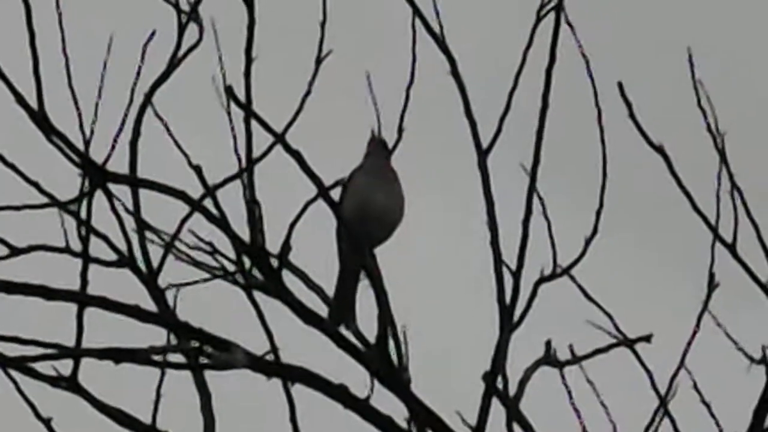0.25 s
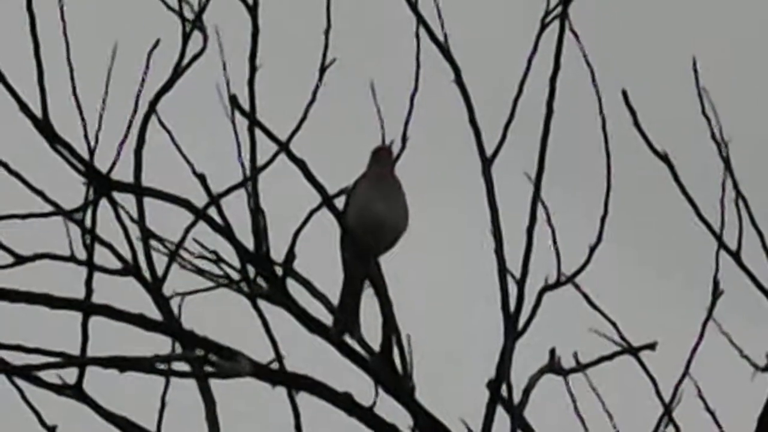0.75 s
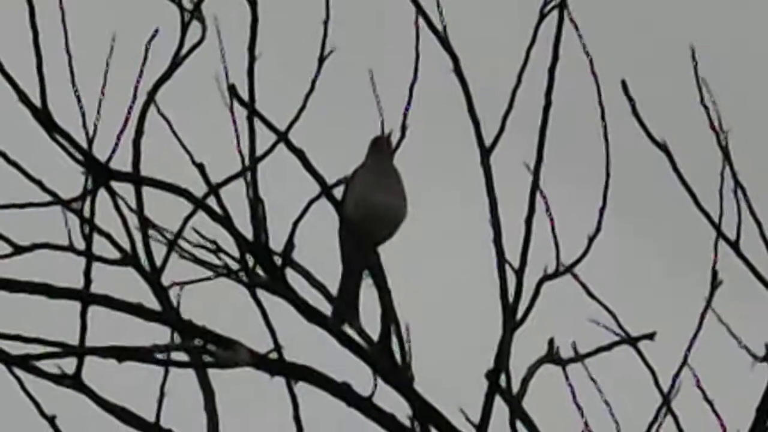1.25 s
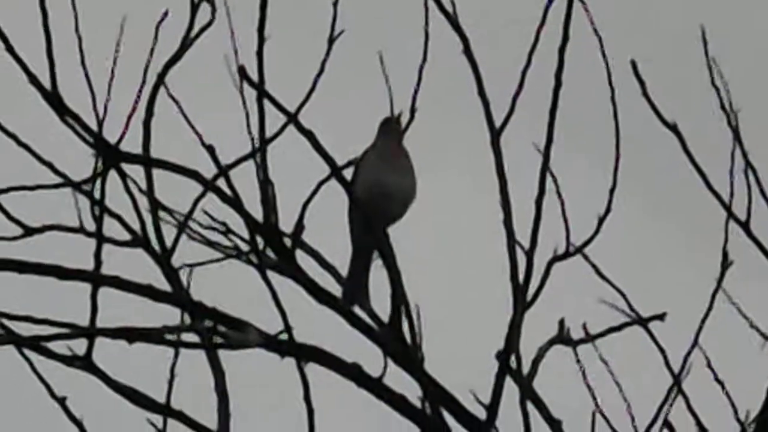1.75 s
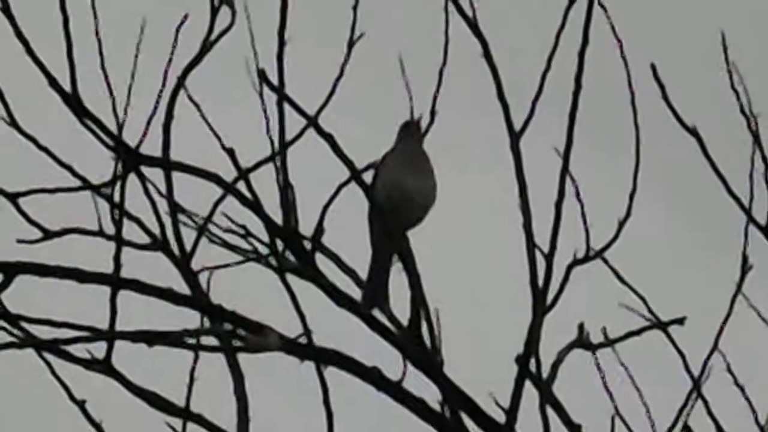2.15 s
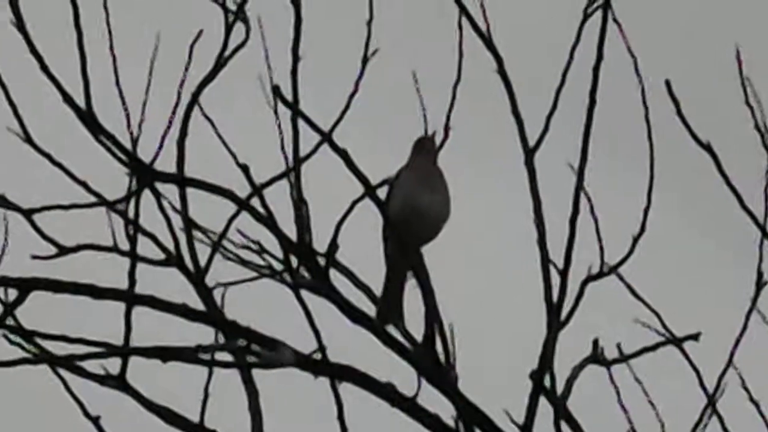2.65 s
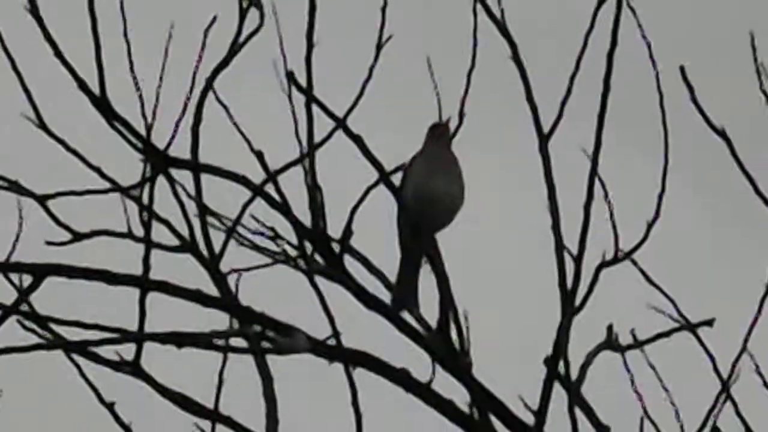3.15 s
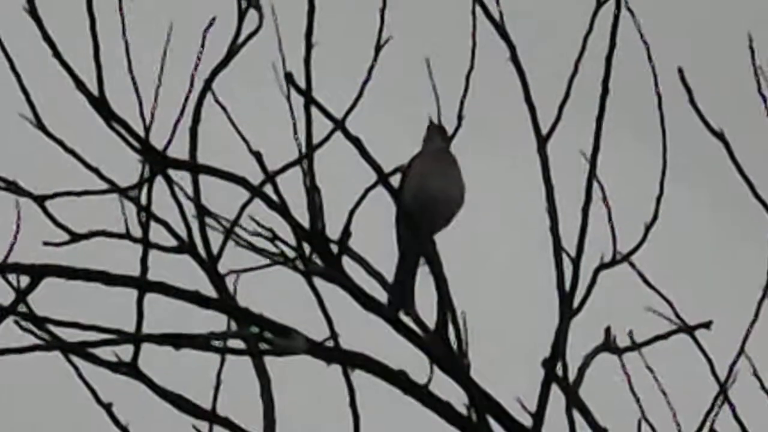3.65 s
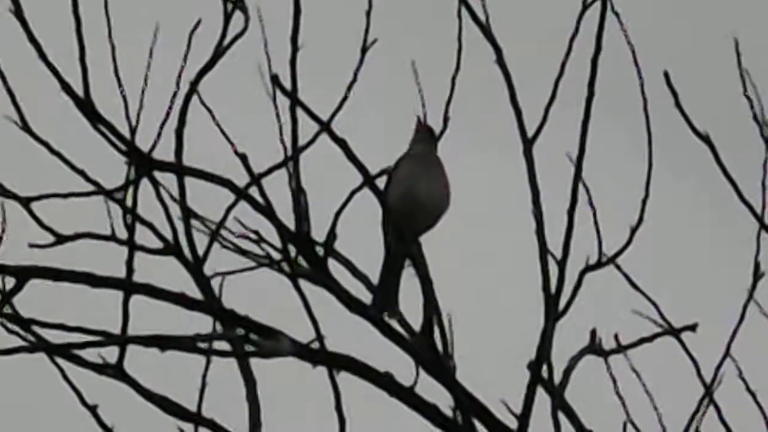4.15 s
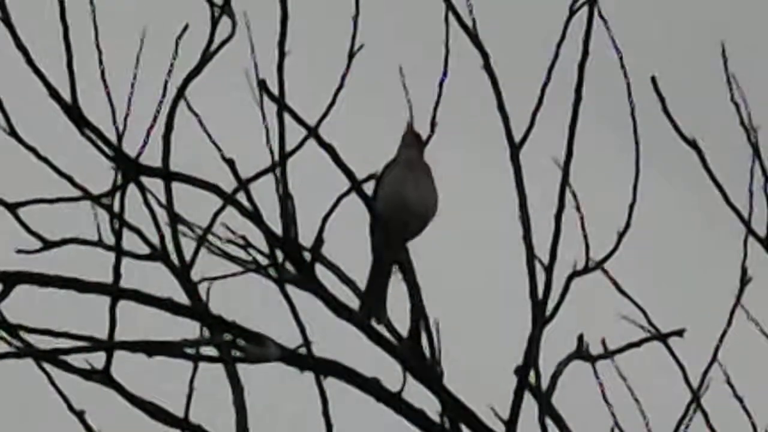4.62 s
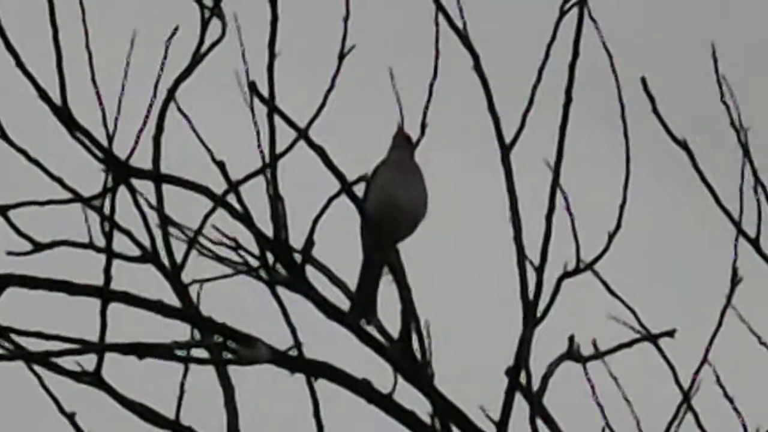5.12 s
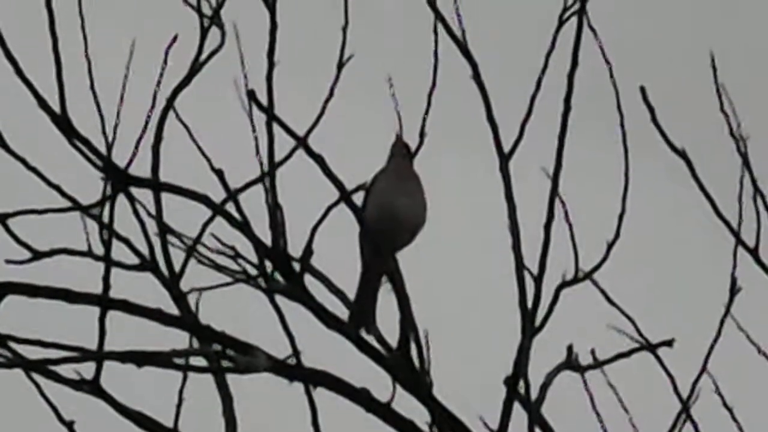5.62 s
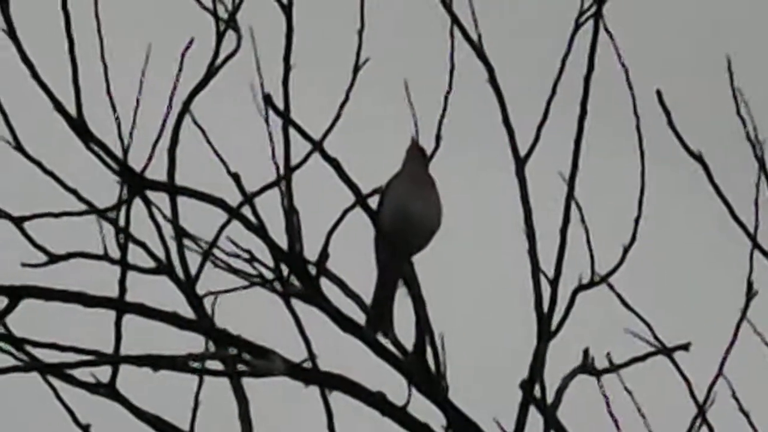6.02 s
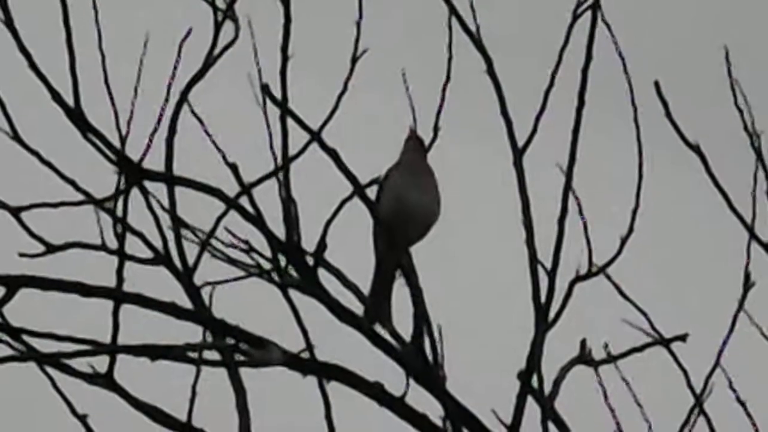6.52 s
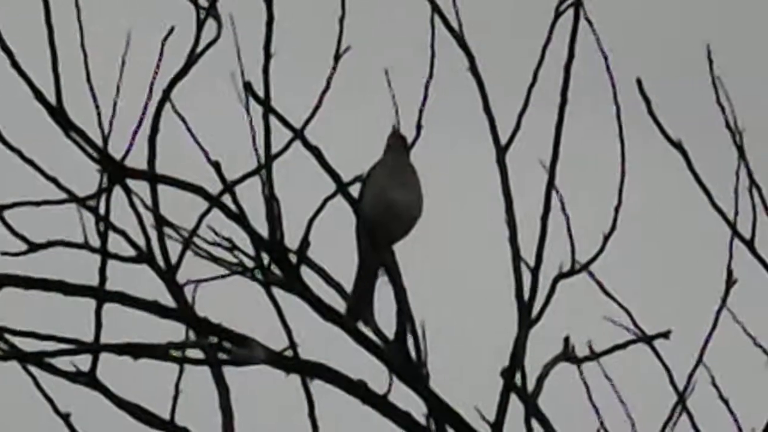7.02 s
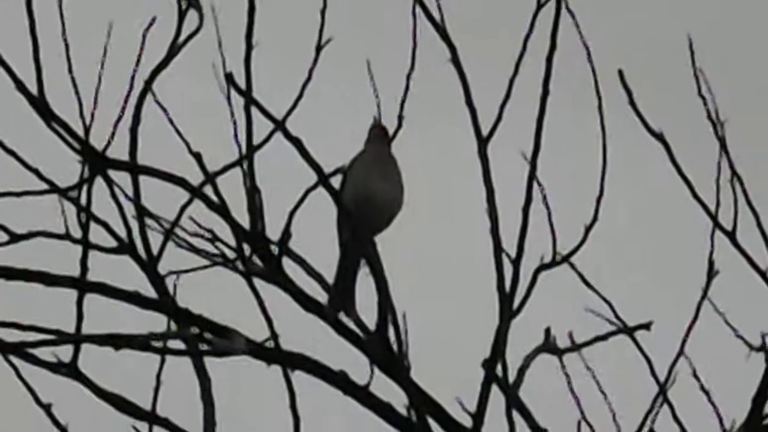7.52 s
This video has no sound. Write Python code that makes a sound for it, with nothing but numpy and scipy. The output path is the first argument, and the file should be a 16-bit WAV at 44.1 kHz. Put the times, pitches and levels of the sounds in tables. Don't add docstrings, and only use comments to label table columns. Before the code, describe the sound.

A damp wood with soft rain hiss, faint traffic hum and low wind rumble. At about 0.2 s a near thrush whistles one strong slur, rising quickly then sinking until 0.5 s. Until about 3 s it rests: distant birds whistle through blurred echoes, drips tick and harder drops knock on wood near 2 to 3 s. At 3.2 s a faint high buzzing rattle and trills come from afar, then a soft low waver at 3.6 s. The thrush returns around 4 s with falling slides, a quick upward sweep at 4.65 s and a clear held note at 4.9 s. A quick drop comes at 5.4 s, a fluttering five-part warble at 6 to 6.2 s, and short falling slurs at 6.5 to 6.7 s. Distant calls continue; wood taps at 7.2 and 7.5 s precede the sharpest knock at 7.6 s. Level dips after loud notes, recovering in steps.

```python
import sys
import numpy as np
from scipy import signal
from scipy.fft import rfft, irfft, next_fast_len
from scipy.io import wavfile
from scipy.ndimage import uniform_filter1d, minimum_filter1d, map_coordinates

SR = 44100
rng = np.random.default_rng(int(sys.argv[2]) if len(sys.argv) > 2 else 0)


def rack_gain(trim_db):
    fader = np.asarray(trim_db, float)
    return 10 ** (fader / 20)


def wav_out(sig):
    wavfile.write(sys.argv[1], SR, np.round(np.clip(np.atleast_2d(sig).T, -1, 1) * 32767).astype(np.int16))


N = 342657
T = np.arange(N) / SR


def unit(x):
    return x / np.sqrt(np.mean(x ** 2) + 1e-20)


def wobble(rate):
    knots = rng.standard_normal(int(N * rate / SR) + 4)
    return map_coordinates(knots, [T * rate])


def coloured(x, spectrum):
    hz, db = np.transpose(spectrum)
    m = next_fast_len(N + 8192)
    log_hz = np.log(np.fft.rfftfreq(m, 1 / SR) + 1)
    gain = rack_gain(np.interp(log_hz, np.log(hz), db, left=-120, right=-120))
    return unit(irfft(rfft(x, m) * gain, m)[:N])


def add(track, s, sound):
    part = track[round(s * SR):][:len(sound)]
    part += sound[:len(part)]


def wood(near_db, near_t60, far_db, far_t60):
    t = np.arange(SR * 3 // 5) / SR
    near = rng.standard_normal(len(t)) * rack_gain(-60 * t / near_t60)
    far = rng.standard_normal(len(t)) * rack_gain(-60 * t / far_t60)
    far *= 1 - np.exp(-t / 0.016)
    answer = rack_gain(near_db) * near / np.linalg.norm(near) + rack_gain(far_db) * far / np.linalg.norm(far)
    answer[0] += 1
    return answer


def whistle(rows, edge_s, overtone_db, warble_hz, flutter_db):
    s, hz, db = np.transpose(rows)
    t = s[0] + np.arange(round((s[-1] - s[0]) * SR)) / SR
    chance = rng.standard_normal(SR)
    shake = unit(uniform_filter1d(chance[:len(t)], size=200))
    flutter = uniform_filter1d(uniform_filter1d(chance[::-1], size=400), size=300)
    flutter = unit(flutter)[:len(t)]
    pitch_hz = uniform_filter1d(np.interp(t, s, hz), size=130) + warble_hz * shake
    phase = 2 * np.pi * np.cumsum(pitch_hz) / SR
    to_end_s = np.minimum(t - s[0], s[-1] - t)
    edge = np.sin(np.pi / 2 * np.clip(to_end_s / edge_s, 0, 1)) ** 2
    level = np.sqrt(2) * rack_gain(np.interp(t, s, db) + flutter_db * np.minimum(flutter, 1)) * edge
    return level * (np.sin(phase) + rack_gain(overtone_db) * np.sin(3 * phase))


# time_s, level_db
GUSTS = [(0.0, -37), (0.32, -41), (0.54, -30), (0.84, -41), (1.84, -27.5), (3.09, -38.5), (3.74, -34.5),
         (4.0, -25.5), (4.09, -35.5), (4.39, -26), (4.7, -25), (5.0, -40), (5.06, -26), (6.34, -39.5),
         (7.66, -36.5), (7.77, -41)]
# frequency_hz, density_db
BUFFET = [(18, -36.5), (30, -4), (38, -3.5), (48, -11), (60, -27)]
# frequency_hz, density_db
RUMBLE = [(26, -34), (45, -6), (59, 0.5), (86, -3.5), (162, -13), (220, -30), (290, -53), (480, -120)]
RUMBLE_DB, RUMBLE_GROWS = -37, 0.11


def wind():
    gust_db = np.interp(T, *np.transpose(GUSTS))
    rumble_db = RUMBLE_DB + RUMBLE_GROWS * (gust_db - gust_db.mean()) + 1.5 * wobble(2.97)
    buffet = rack_gain(gust_db + 1.3) * coloured(rng.standard_normal(N), BUFFET)
    return buffet + rack_gain(rumble_db) * coloured(rng.standard_normal(N), RUMBLE)


# frequency_hz, density_db
RAIN = [(88, -35.5), (150, -4.5), (308, -6.5), (510, -9.5), (670, -12.5), (1150, -11.5), (1350, -13),
        (1570, -9.5), (2560, -9), (3290, -2), (5250, -26), (9040, -34), (15900, -43)]
RAIN_DB, RAIN_EASES_DB = -35.5, 2.5


def rain(spiky_db, grains):
    ticks = (rng.random(N) < grains / SR) * rack_gain(spiky_db * np.minimum(rng.exponential(size=N), 3))
    smear = rack_gain(-60 * np.arange(600) / SR / .013) * rng.standard_normal(600)
    treble = signal.butter(4, 4500, "high", fs=SR, output="sos")
    ticks = signal.sosfilt(treble, signal.fftconvolve(ticks, smear)[:N])
    hiss = rng.standard_normal(N) * rack_gain(1.4 * wobble(12))
    level = rack_gain(RAIN_DB - RAIN_EASES_DB * T * SR / N)
    return level * coloured(hiss + rack_gain(-6.5) * unit(ticks), RAIN)


# start_s, end_s, first_hz, last_hz, level_db
HUMS = [
    (0, .297, 350, 350, -45.5),
    (0, .256, 453, 453, -45.5),
    (4.27, 4.68, 592, 632, -49),
    (4.58, 5.06, 630, 612, -52),
    (4.62, 4.88, 314, 314, -46.5),
    (4.5, 4.63, 340, 380, -50),
    (4.22, 4.34, 355, 335, -48),
    (5.124, 5.588, 280, 250, -45.5),
    (1.7, 1.812, 860, 930, -48.5),
]


def drones():
    drift, hum = 0.8 * wobble(12), np.zeros(N)
    for start_s, end_s, first_hz, last_hz, db in HUMS:
        u = np.clip((T - start_s) / (end_s - start_s), 0, 1)
        hz = first_hz + (last_hz - first_hz) * u
        swell = np.sin(np.pi * u) ** 0.64
        hum += rack_gain(db) * swell * np.sin(2 * np.pi * np.cumsum(hz) / SR + drift)
    return rack_gain(2.5 * wobble(24)) * hum


# frequency_hz, density_db
CHORUS = [(2200, -24), (2800, -5.5), (3300, 1.5), (3800, -8.5), (4800, -15.5), (5600, -30.5)]
# time_s, level_db
CHOIR = [(0, -27.5), (.34, -53), (.54, -31), (1.5, -32.5), (1.7, -41), (3.27, -34.5), (3.94, -31.5),
         (4.37, -37.5), (4.799, -31), (5.3, -31), (5.84, -33), (6.14, -35.5), (7.5, -37), (7.77, -55)]


def chorus(count):
    blur, t = np.zeros(N), np.arange(SR // 12) / SR
    for u, pitch, glide, size in rng.random((count, 4)):
        glide_hz = 10000 * (glide - .6 + 0.3 * np.sign(glide - .6))
        hz = 2900 + 950 * pitch ** 1.6 + glide_hz * (t - .04)
        slur = np.hanning(len(t)) * np.sin(2 * np.pi * np.cumsum(hz) / SR)
        add(blur, u * N / SR, rack_gain(7 * size) * slur)
    blur = signal.fftconvolve(blur, wood(near_db=3.0, near_t60=0.13, far_db=5, far_t60=0.58))[:N]
    band = rack_gain(2.0 + 2.1 * wobble(9)) * coloured(rng.standard_normal(N), CHORUS)
    return rack_gain(np.interp(T, *np.transpose(CHOIR))) * unit(unit(blur) + band)


# start_s, peak_db
SPLASHES = [(.0344, -40), (.1062, -36.5), (.7135, -35), (1.827, -39.5), (1.886, -38), (2.1535, -36.5),
            (2.1694, -43), (2.7482, -31.5), (2.822, -36), (2.8334, -32.5), (3.7414, -43.5), (4.4804, -33),
            (4.6674, -42), (4.7986, -34.5), (5.8014, -36), (6.054, -32), (6.263, -34), (6.4454, -34.5),
            (6.5175, -35), (6.8036, -35), (6.832, -30.5), (7.5844, -36)]
# start_s, peak_db
PATS = [(.5342, -31), (1.065, -35.5), (1.2212, -31), (1.372, -42), (2.3446, -42.5), (2.5172, -32.5),
        (3.2894, -42), (3.5224, -33), (3.9724, -31), (5.096, -32), (5.161, -47), (5.235, -40.5),
        (5.5303, -28.5), (6.6072, -32), (6.6567, -24), (6.9626, -39.5), (7.442, -36), (7.5098, -32)]
# start_s, peak_db
TICKS = [
    (.8345, -47.5),
    (.9564, -44),
    (1.732, -40),
    (5.8316, -38),
]
# start_s, peak_db, pitch_hz
TAPS = [(1.962, -18.5, 3070), (2.3299, -17.5, 3490), (2.86, -24, 3900), (2.931, -18, 3120),
        (5.704, -15.5, 3000), (7.205, -21.5, 1810), (7.511, -20, 3300), (7.512, -24, 4500),
        (7.628, -8.5, 3150), (7.627, -23, 2250), (7.629, -27, 5300), (7.644, -17, 3200), (7.656, -16, 3150),
        (7.206, -24, 2900), (2.33, -24, 4500), (1.803, -28, 2600)]
# start_s, peak_db, pitch_hz
PLOPS = [
    (.11, -33, 1090),
    (2.499, -35, 1105),
    (3.02, -41, 1113),
    (6.12, -39, 780),
    (1.098, -38, 1495),
    (5.2, -39, 1494),
]
# pitch_hz, splash_db, band edge over centre (ratio)
SPLASH, PAT, TICK = (4850, -13, 1.28), (4900, -26, 1.28), (7500, -17, 1.28)
TAP_SPLASH_DB, TAP_EDGE = -34.5, 1.13


def drips():
    wet, t = np.zeros(N), np.arange(SR // 20) / SR
    bright = signal.butter(2, 8000, "high", fs=SR, output="sos")
    drops = [(*tap, TAP_SPLASH_DB, TAP_EDGE) for tap in TAPS]
    for rows, kind in [(SPLASHES, SPLASH), (PATS, PAT), (TICKS, TICK)]:
        drops += [(s, db, *kind) for s, db in rows]
    for s, db, hz, splash_db, edge in drops:
        body = signal.butter(3, [hz / edge, hz * edge], "band", fs=SR, output="sos")
        puff = rng.standard_normal((2, len(t))) * rack_gain(-60 * t / 0.017) * (1 - np.exp(-t / 0.00053))
        tap = signal.sosfilt(body, puff[0])
        splash = signal.sosfilt(bright, puff[1])
        drop = rack_gain(db + 1.5) * (tap / abs(tap).max() + rack_gain(splash_db) * splash / abs(splash).max())
        answer = wood(near_db=-4.0, near_t60=0.27, far_db=-10.0, far_t60=0.36)
        add(wet, s, signal.fftconvolve(drop, answer))
    for s, db, hz in PLOPS:
        ring = np.sin(2 * np.pi * hz * (t + 1.8 * t * t))
        bubble = rack_gain(db - 60 * t / 0.059) * ring * (1 - np.exp(-t / 0.0014))
        answer = wood(near_db=5.0, near_t60=0.28, far_db=-8.0, far_t60=0.29)
        add(wet, s, signal.fftconvolve(bubble, answer))
    return wet


# start_s, length_s, top_hz, bottom_hz, level_db
TRILLS = [(4.44, 0.17, 2480, 1900, -25), (3.27, .34, 4950, 2900, -31.5), (3.88, .1, 2650, 2000, -36),
          (6.22, .2, 2700, 1950, -37), (7.635, 0.025, 3350, 2900, -31), (3.465, .035, 4300, 3000, -28),
          (.55, .17, 5400, 3400, -41.5), (2.56, 0.19, 5200, 3700, -41), (6.97, 0.147, 5300, 3700, -42),
          (4.73, .1, 5400, 3800, -40), (1.12, .3, 5200, 3900, -44.5), (3.64, .39, 2800, 2300, -36),
          (4.48, 0.16, 4100, 3300, -35), (6.675, .03, 4200, 3300, -37), (3.6, .085, 3450, 2850, -27.5),
          (3.7, .14, 3350, 2800, -32), (2.63, 0.21, 3600, 3050, -34), (2.96, 0.08, 6500, 2400, -46),
          (6.26, 0.12, 4600, 3100, -38.5), (6.42, 0.097, 5000, 3600, -39.5)]
# start_s, length_s, top_hz, bottom_hz, level_db
RASPS = [
    (7.203, 0.037, 2900, 1400, -31.5),
    (4.762, 0.027, 2100, 1300, -34),
    (3.24, .38, 6700, 4500, -45.5),
]
TRILL_RATE, RASP_RATE, BUZZ_RATE = 32, 130, 56
TRILL_ECHO_DB, BUZZ_ECHO_DB = 6, -1.5
BUZZ_S, BUZZ_PERIOD_S, BUZZ_LENGTH_S, BUZZ_HZ, BUZZ_DB = 3.243, .0965, 0.052, (6940, 6000), -34.5


def trills():
    calls, pace = np.zeros(N), 1 + 0.3 * wobble(30)
    bursts = [(*row, TRILL_RATE, TRILL_ECHO_DB) for row in TRILLS]
    bursts += [(*row, RASP_RATE, TRILL_ECHO_DB) for row in RASPS]
    for k in range(4):
        start_s = BUZZ_S + k * BUZZ_PERIOD_S
        bursts.append((start_s, BUZZ_LENGTH_S, *BUZZ_HZ, BUZZ_DB, BUZZ_RATE, BUZZ_ECHO_DB))
    for s, length, top_hz, bottom_hz, db, rate, echo_db in bursts:
        t = np.arange(round(length * SR)) / SR
        turn = np.cumsum(rate * pace[round(s * SR):][:len(t)]) / SR % 1
        hz = top_hz + (bottom_hz - top_hz) * turn ** 1.4
        level = rack_gain(db) * np.sin(np.pi * turn ** .9) * signal.windows.tukey(len(t), .15)
        note = level * np.sin(2 * np.pi * np.cumsum(hz) / SR)
        answer = wood(near_db=echo_db, near_t60=.16, far_db=echo_db - 1.5, far_t60=.6)
        add(calls, s, signal.fftconvolve(note, answer))
    return rack_gain(-2.5) * calls


# start_s, length_s, pitch_hz, level_db
HELD = [(0.689, .15, 6000, -53), (0.848, 0.025, 1925, -39), (1.022, 0.23, 3065, -27),
        (7.016, .03, 7280, -41), (4.004, .03, 7150, -44), (7.0, .09, 4360, -38), (5.72, .1, 3520, -34),
        (0.86, .09, 3880, -41), (5.45, .16, 2735, -33), (5.44, .06, 3070, -25), (6.565, .05, 3120, -24),
        (6.795, .025, 3100, -33), (3.94, .02, 2570, -27), (3.745, .04, 2060, -30), (6.81, .07, 7150, -58),
        (2.846, 0.09, 7300, -56.5), (2.926, 0.032, 3204, -30.5), (3.74, 0.03, 3170, -27),
        (4.285, .1, 4900, -31), (4.3, .07, 4790, -33), (6.297, 0.13, 3375, -31.5),
        (7.016, 0.112, 3324, -33.5), (6.32, 0.064, 3820, -39), (7.06, .06, 3850, -43)]
# start_s, length_s, first_hz,
# last_hz, level_db
SLIDES = [(0.482, 0.05, 3880, 3950, -35), (0.79, 0.045, 3200, 3400, -22), (.5, .24, 3480, 3570, -26),
          (.63, .06, 3270, 3400, -32), (.835, .16, 3480, 3570, -26), (5.5, .22, 3450, 3530, -27),
          (5.11, .27, 2960, 3090, -27), (5.7, .04, 3320, 3150, -25), (5.82, .18, 3450, 3560, -27),
          (5.935, .045, 3150, 3260, -24), (4.33, .03, 1820, 2200, -33), (2.622, .149, 3150, 3500, -31),
          (3.2, .03, 2200, 2500, -38), (3.352, .077, 3166, 3360, -28), (3.867, 0.023, 3200, 3000, -24),
          (4.228, 0.06, 3250, 2680, -25), (4.473, .14, 3955, 3326, -35), (4.787, 0.05, 3220, 3000, -28.5),
          (3.72, .03, 3200, 2650, -31), (3.75, 0.025, 3000, 2500, -31), (3.865, .03, 2950, 2400, -29),
          (3.848, .02, 3200, 2700, -31), (2.928, .045, 3500, 3000, -32), (1.32, .07, 3150, 3700, -30),
          (1.788, 0.044, 4730, 4350, -40.5), (5.263, 0.074, 4880, 3180, -23.5),
          (3.27, .05, 5140, 3670, -32.5), (3.416, 0.036, 4710, 3650, -33), (3.557, .053, 4940, 3605, -29),
          (1.295, 0.079, 4700, 4050, -38), (1.368, 0.048, 4000, 4300, -40)]
# start_s, held_hz, level_db
FALLS = [
    (1.126, 4530, -40.5),
    (2.55, 4190, -35),
    (3.94, 4330, -32),
    (4.73, 4190, -34),
    (6.228, 4390, -37),
    (6.958, 4380, -32),
]
FALL_S, FALL_SPAN_HZ, FALL_DB, LAND_S = .042, 1150, -5, .055
# start_s, first_hz, level_db
CHIPS = [
    (.183, 7450, -37.5),
    (4.006, 7270, -36.5),
    (7.018, 7450, -34),
]
CHIP_S, CHIP_END_HZ = .035, 6000
# start_s, pitch_hz, level_db
SEEPS = [(.142, 6770, -47), (.614, 8400, -56.5), (.954, 7900, -47), (1.43, 7800, -62), (1.533, 8500, -59),
         (1.717, 7830, -45.5), (2.94, 8260, -55), (3.54, 8000, -46), (4.601, 8270, -55.5),
         (4.87, 6580, -61), (5.515, 7700, -45.5), (5.662, 8050, -57), (6.416, 7750, -47), (7.05, 8600, -58),
         (7.302, 8120, -48)]
SEEP_S, SEEP_SAG_HZ = 0.043, 200


def far_notes():
    notes = [(s, length, hz, hz, db) for s, length, hz, db in HELD]
    notes += SLIDES
    notes += [(s, FALL_S, hz + FALL_SPAN_HZ, hz, db + FALL_DB) for s, hz, db in FALLS]
    notes += [(s + FALL_S, LAND_S, hz, .98 * hz, db) for s, hz, db in FALLS]
    notes += [(s, CHIP_S, hz, CHIP_END_HZ, db) for s, hz, db in CHIPS]
    notes += [(s, SEEP_S, hz, hz - SEEP_SAG_HZ, db) for s, hz, db in SEEPS]
    return notes


WANDER_HZ, WANDER_S = 14, .03


def others():
    calls = np.zeros(N)
    for s, length, first_hz, last_hz, db in far_notes():
        u = np.linspace(0, 1, num=int(length / WANDER_S) + 3)
        stray_hz = WANDER_HZ * rng.standard_normal(16)[:len(u)]
        hz = first_hz + (last_hz - first_hz) * u + stray_hz
        rows = np.c_[s + length * u, hz, db - 2.5 * u]
        span_hz = abs(first_hz - last_hz)
        shake_hz = .14 * max(span_hz - 100, 0) + 22 + 70 * (first_hz / 8000) ** 3
        note = whistle(rows, edge_s=.012, overtone_db=-70, warble_hz=shake_hz, flutter_db=3)
        echo_db = 8 * min(span_hz / 500, 1.6) + 1
        answer = wood(near_db=echo_db, near_t60=0.2, far_db=echo_db - 3.5, far_t60=0.76)
        heard = signal.fftconvolve(note, answer)
        add(calls, s, heard * np.linalg.norm(note) / np.linalg.norm(heard))
    return rack_gain(.6) * calls


# delay_ms, gain (ratio)
BOUNCES = [
    (2.93, 0.21),
    (5.9, .8),
    (16.9, -.15),
]


def bounced(x):
    m = next_fast_len(N + 8192)
    khz = np.fft.rfftfreq(m, 1000 / SR)
    comb = 1 + sum(gain * np.exp(-2j * np.pi * khz * ms) for ms, gain in BOUNCES)
    response = unit(abs(comb)) * np.exp(1j * np.angle(comb))
    return irfft(rfft(x, m) * response, m)[:N]


# pitch_hz, level_db
THROAT = [(1770, -25), (2050, -24.5), (2350, -16.5), (2550, -5), (2750, -2.5), (3100, 0), (3250, 0),
          (3600, -13)]
# (time_s, pitch_hz)
SLURS = [ (-5.5, -12, -7, [(.173, 1990), (.222, 2520), (.24, 2712), (.266, 2890), (.293, 3200),
         (.306, 3235), (.326, 3200), (.48, 2035), (.51, 1900)]), (-13.5, 8.5, 2, [(3.988, 3030),
         (4.003, 3200), (4.04, 2944), (4.075, 2700), (4.092, 2560)]), (-3.5, -7, -8.5, [(4.096, 2573),
         (4.13, 2548), (4.174, 2525)]), (-9, 4, 0, [(4.383, 2536), (4.41, 2490), (4.428, 2396),
         (4.45, 2120)]), (-5, 1, -11, [(4.651, 2790), (4.661, 3600)]), (-13, 7.5, 1.5, [(4.83, 3400),
         (4.845, 3240), (4.875, 2636), (4.89, 2400), (4.9, 2920)]), (0, -10, -13, [(4.899, 2852),
         (4.965, 2851), (5.005, 2872), (5.062, 2912)]), (-13.5, 3, 0.5, [(5.387, 3620), (5.403, 3330),
         (5.409, 3090), (5.418, 3057), (5.424, 2750), (5.437, 2710), (5.447, 2314), (5.47, 2000),
         (5.497, 1770)]), (-12, 0, -4, [(6.522, 2752), (6.535, 3100), (6.544, 3200), (6.551, 3160),
         (6.56, 2765), (6.578, 2320), (6.6, 1940)]), (-14, -1, 1, [(6.633, 2386), (6.655, 2150)]),
         (-6.5, -3, 0, [(6.662, 2180), (6.687, 2000), (6.708, 1860)]), ]
ATTACK_DB, ATTACK_S = -8, .012
# start_s, held_hz, held_db, flick_db
WARBLE = [
    (5.978, 2606, -18, -17),
    (6.018, 2562, -18.5, -16),
    (6.067, 2545, -11.5, -13.5),
    (6.114, 2490, -13, -15.5),
    (6.167, 2420, -20.5, -20.5),
]
HOLD_S, FLICK_S, DWELL_S, TUMBLE_S = 0.028, .003, .003, .009
FLICK_RATIO, TUMBLE_HZ, TUMBLE_DB = 1.225, 2250, -7
# time_s, pitch_hz, level_db
WAVER = [
    [(3.577, 1886, -33), (3.598, 2020, -31), (3.612, 1950, -35), (3.622, 1870, -27), (3.64, 2200, -38),
     (3.656, 2268, -34), (3.672, 2224, -25), (3.684, 2042, -35), (3.7, 2046, -31)],
    [(3.7, 2278, -32), (3.716, 2342, -25), (3.75, 2060, -26), (3.776, 2342, -24), (3.8, 2190, -28),
     (3.808, 2125, -35), (3.832, 2165, -31.5), (3.85, 2133, -44)],
]
# time_s, pitch_hz, level_db
ASIDES = [
    [(3.13, 2480, -38), (3.145, 2620, -34), (3.155, 2700, -34), (3.172, 2560, -34), (3.195, 2440, -36)],
    [(5.66, 4900, -36), (5.675, 4450, -31), (5.685, 4050, -30), (5.7, 3990, -32)],
]
WARBLE_ECHO_DB, FLICK_ECHO_DB, WAVER_ECHO_DB = -12, -2, 1.5


def thrush():
    notes = []
    for db, fade_db, echo_db, pitch in SLURS:
        s, hz = np.transpose(pitch)
        at = np.arange(s[0], s[-1], 1 / 500)
        hz = np.interp(at, s, hz)
        u = (at - s[0]) / (s[-1] - s[0])
        attack_db = ATTACK_DB * np.clip(1 - (at - s[0]) / ATTACK_S, 0, 1)
        level_db = db + fade_db * u ** 2 + attack_db + np.interp(hz, *np.transpose(THROAT))
        notes.append((echo_db, np.c_[at, hz, level_db]))
    for s, hz, db, flick_db in WARBLE:
        up, top_hz = s + HOLD_S + FLICK_S, FLICK_RATIO * hz
        notes.append((WARBLE_ECHO_DB, [(s, hz, db), (up, hz, db)]))
        flick = [(s + HOLD_S - FLICK_S, 0.932 * top_hz, flick_db),
                 (up, top_hz, flick_db),
                 (up + DWELL_S, .93 * top_hz, flick_db),
                 (up + DWELL_S + TUMBLE_S, TUMBLE_HZ, flick_db + TUMBLE_DB)]
        notes.append((FLICK_ECHO_DB, flick))
    for rows in [*WAVER, *ASIDES]:
        notes.append((WAVER_ECHO_DB, np.subtract(rows, [0, 0, 2 * WAVER_ECHO_DB])))
    song, echoes = np.zeros((2, N))
    for echo_db, rows in notes:
        veiled_db = max(echo_db, 0)
        note = whistle(rows, edge_s=.003, overtone_db=-62,
                       warble_hz=3 + 12 * veiled_db, flutter_db=1.2 + .7 * veiled_db)
        answer = wood(near_db=echo_db, near_t60=0.16, far_db=0.55 * echo_db - 6.5, far_t60=0.57)
        near = len(answer) // 12
        add(song, rows[0][0], signal.fftconvolve(note, answer[:near]))
        add(echoes, rows[0][0] + near / SR, signal.fftconvolve(note, answer[near:]))
    return bounced(song) + echoes


def scene():
    weather = wind() + rain(spiky_db=2.5, grains=63) + drips()
    far = drones() + chorus(count=340) + trills() + others()
    return (weather + far + thrush())[None]


def top_cut(x):
    return signal.sosfilt(signal.butter(12, 15730, fs=SR, output="sos"), x)


# cut_s, depth_db, climb_start_s, climb_length_s
CUTS = [
    (.2418, 2, .33, .19),
    (.2682, 3, .33, .19),
    (.2975, 3, .33, .19),
    (4.0252, 1, 4.1, .2),
    (4.051, 1.5, 4.1, .2),
    (4.0731, 5, 4.1, .2),
    (4.8543, 2, 5.04, .19),
    (4.908, 2, 5.04, .19),
    (4.9182, 4, 5.04, .19),
    (6.554, 1.8, 6.6, .1),
]
STAIR_S, CEILING = .032, .8
WHINE_HZ, WHINE_DB, TOP_HZ = 15725, -83, 15780


def record(dry):
    gain_db, reach = np.zeros(N), SR // 1500
    for s, depth_db, start, length in CUTS:
        first = round(s * SR) - reach
        crest = first + np.argmax(abs(dry[0, first:first + 2 * reach]))
        back = np.clip(np.ceil((T - start) / STAIR_S) * STAIR_S / length, 0, 1)
        back = uniform_filter1d(back, size=14)
        gain_db -= depth_db * (np.arange(N) > crest) * (1 - back)
    whine = rack_gain(WHINE_DB + 3) * np.sin(2 * np.pi * WHINE_HZ * T)
    out = (dry + whine) * rack_gain(uniform_filter1d(gain_db, size=2))
    m = next_fast_len(N + 8192)
    passed = np.fft.rfftfreq(m, 1 / SR) < TOP_HZ
    out = irfft(rfft(out, m) * passed, m)[:, :N]
    held = minimum_filter1d(np.minimum(1, CEILING / (abs(out) + 1e-9)), size=201)
    return top_cut(out * uniform_filter1d(held, size=201))


dry = scene()
out = record(dry)
wav_out(out)
```